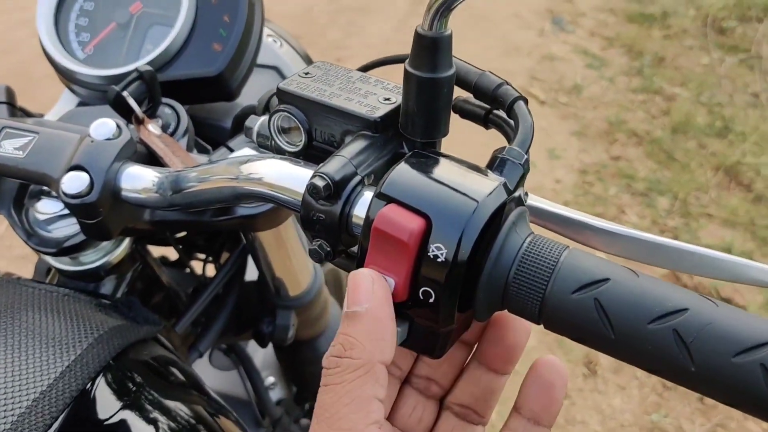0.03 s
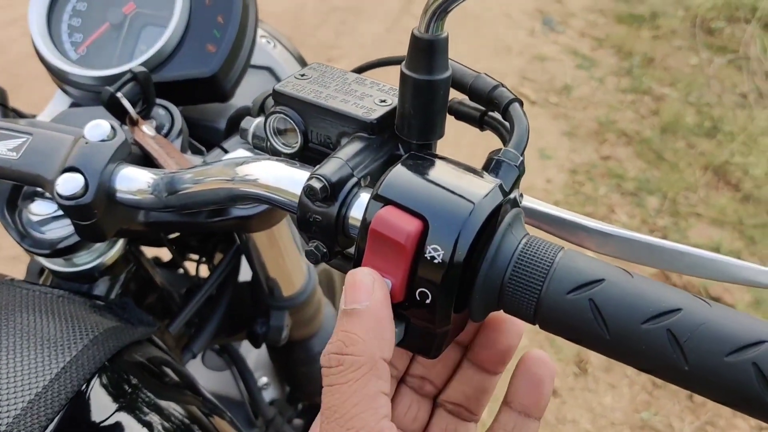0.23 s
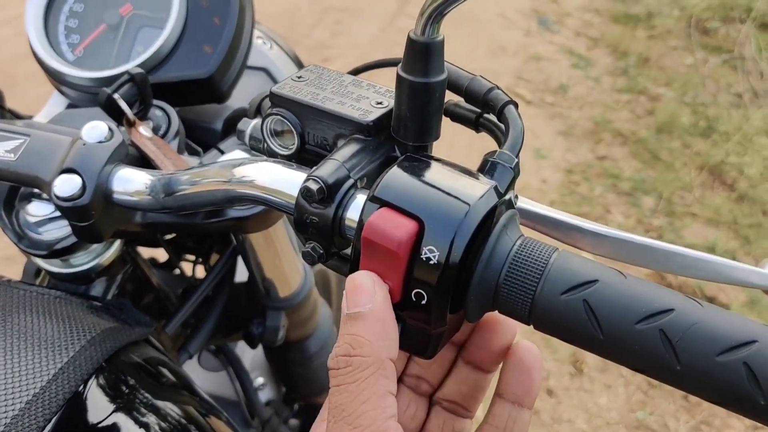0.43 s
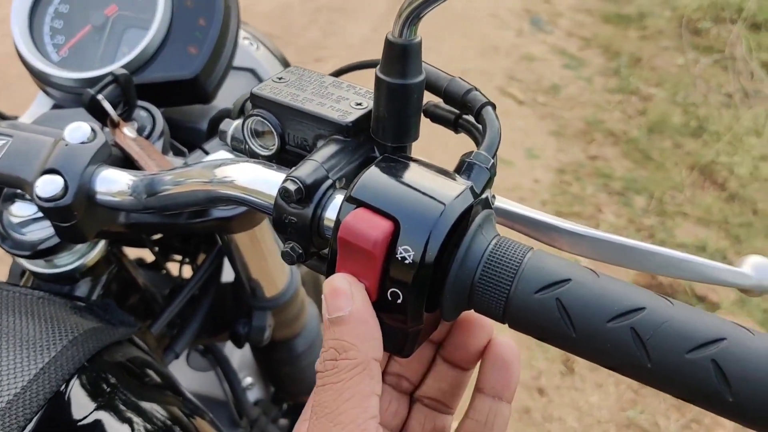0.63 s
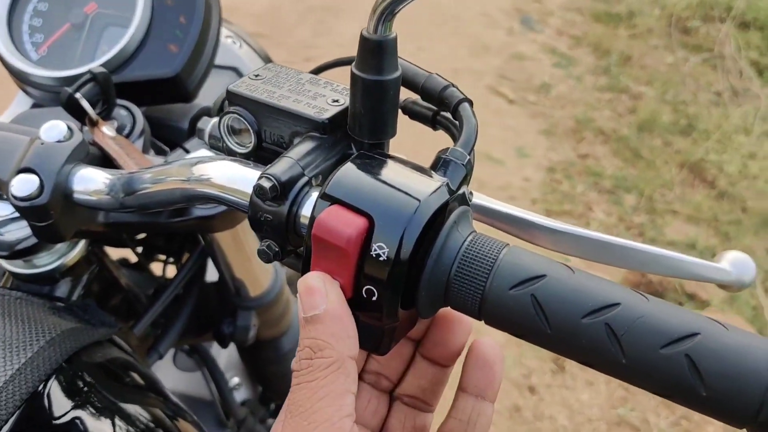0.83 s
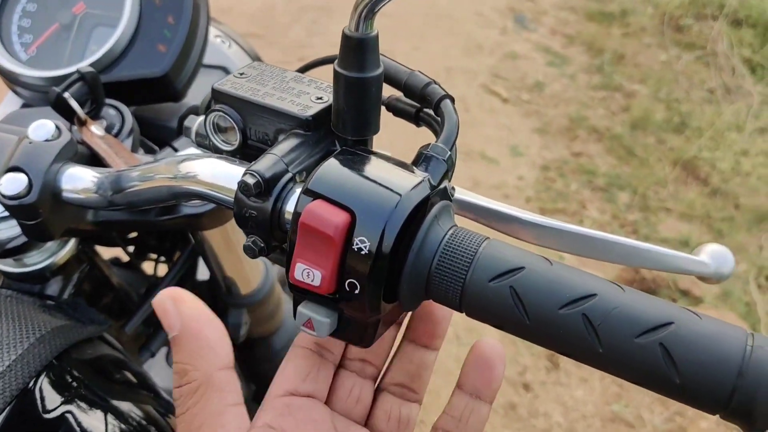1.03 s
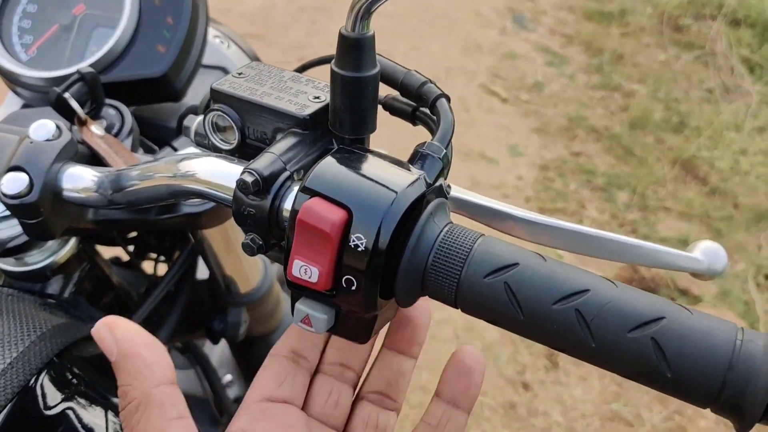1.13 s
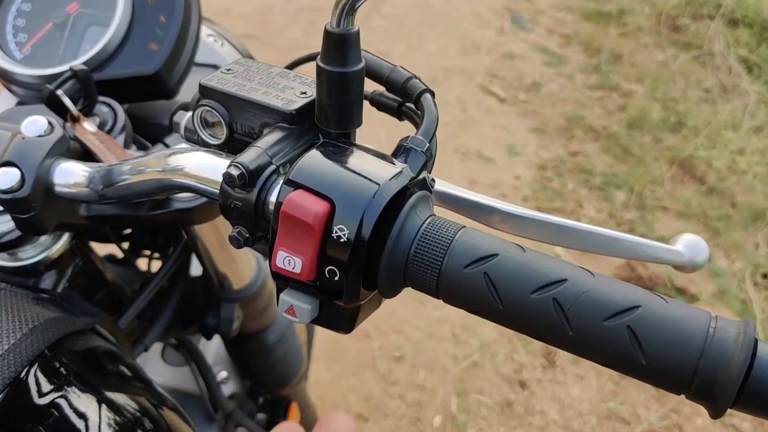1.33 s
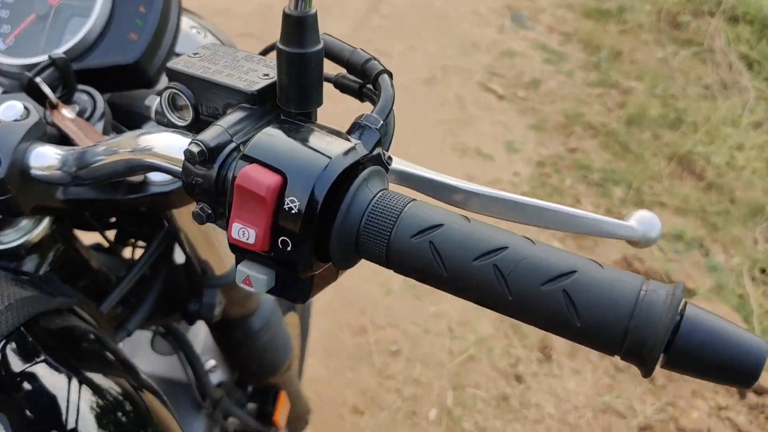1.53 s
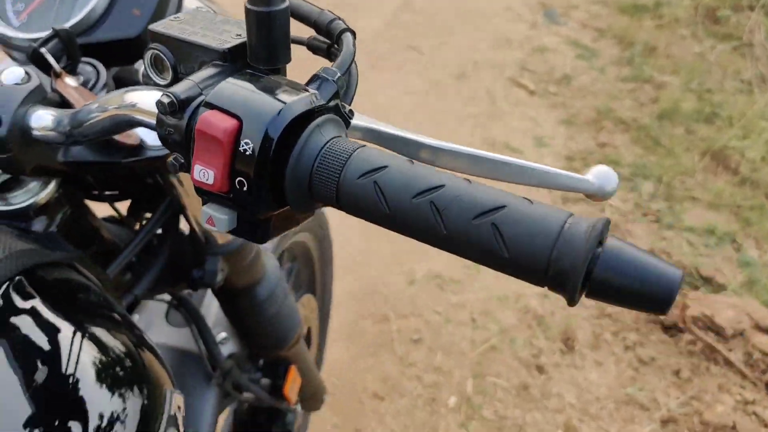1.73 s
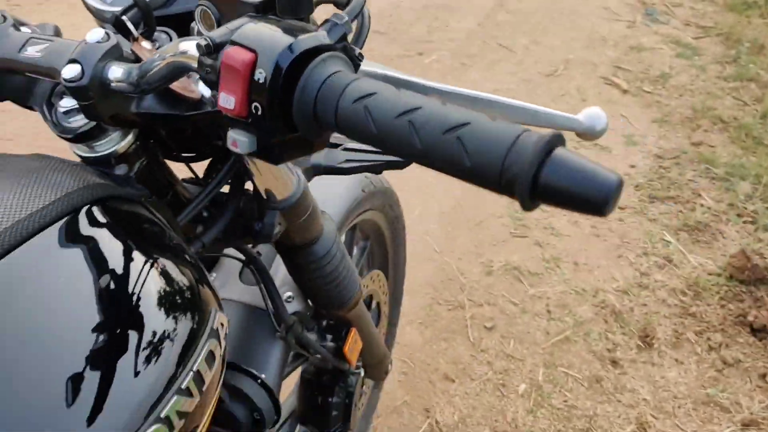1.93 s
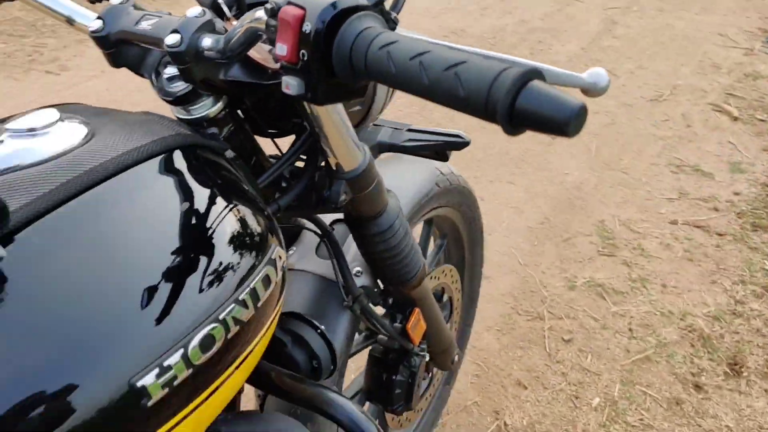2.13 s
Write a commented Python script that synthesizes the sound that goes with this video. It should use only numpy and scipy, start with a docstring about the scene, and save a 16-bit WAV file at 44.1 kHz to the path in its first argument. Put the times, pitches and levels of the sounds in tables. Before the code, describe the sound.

Motorcycle start-up outdoors, a short grinding starter whirr, the single-cylinder engine catching and idling with clatter

```python
"""Motorcycle starting outdoors

A single-cylinder motorcycle is started, heard from a phone held by the handlebar; a far bird calls first.
Coloured noise makes the yard, wind, starter grind, knocks and clatter; gliding sines make the gear whines,
short casing rings and bird. Short pressure swings make the puffs and firings, which settle to a thumping
idle with a silencer ring.
The right microphone port is half covered: it lags, rings near 1.5 kHz and is dull above.
"""
import sys
import numpy as np
from scipy import signal
from scipy.fft import rfft, irfft, next_fast_len
from scipy.io import wavfile
from scipy.ndimage import uniform_filter1d

SR = 44100
rng = np.random.default_rng(int(sys.argv[2]) if len(sys.argv) > 2 else 0)


def dump(signal):
    """Clip the signal to [-1, 1] and save it as 16-bit WAV at the path in sys.argv[1]."""
    limited = np.clip(np.atleast_2d(signal).T, -1, 1)
    pcm = np.round(limited * 32767).astype(np.int16)
    wavfile.write(sys.argv[1], SR, pcm)


def volts(x):
    """Linear amplitude factor 10**(x/20) for a level x in dB, scalar or array-like."""
    e = np.asarray(x, float) / 20
    return 10 ** e


N = 95697
T = np.arange(N) / SR  # time in s
PADDED = next_fast_len(N + 8192)  # transform length, with room for tails
SILENT_DB = -150

# Spectra give only the colour of a noise: its overall level is set apart.
# background of the yard: f/Hz, density/dB
YARD_COLOUR = [(120, -51), (200, -3), (293, -12), (414, -23.5), (1260, -19), (3420, -26.5), (4180, -31.5),
               (4840, -23), (6830, -72), (15500, -47)]
YARD_DB = -51.5
# wind rumble: f/Hz, density/dB
WIND_COLOUR = [(15, -2), (30, -2.5), (90, -1.5), (150, -9.5), (280, -26.5), (400, -68)]
# wind strength before the left and right offsets: t/s, level/dB
GUSTS = [(0, -42), (.4, -45), (.6, -51), (.75, -41.5), (2.17, -41)]
# how alike the noise is at both ports: f/Hz, likeness/(0 to 1)
LIKENESS = [(300, 0.98), (500, 1), (700, 0.04), (1300, 0.73), (2000, 0.53), (3000, 0.43), (4000, 0),
            (15000, .03)]
# a far bird, before its level flickers: t/s, f/Hz, level/dB
BIRD = [(.14, 7700, -74), (.19, 6600, -71), (.255, 5350, -61), (.31, 4700, -63)]

# starter strength: t/s, grind level/dB, brush hiss level/dB, drive of the casing ring/dB
STARTER = [(0.443, -24.5, -51, -25), (0.461, -32, -51.5, -23), (.482, -26.5, -41, -38),
           (0.522, -25, -38, -47), (.55, -30.5, -49.5, -40), (.596, -33.5, -53.5, -30.5),
           (.604, -25.5, -39, -34), (.64, -29.5, -43.5, -24.5), (.66, -28.5, -38, -22),
           (.69, -30, -39.5, -23), (.725, -31.5, -45, -24.5), (0.759, -30, -35, -14.5),
           (.802, -28.5, -38, -19.5), (0.831, -30.5, -48.5, -32), (.862, -33.5, -49, -26),
           (0.871, -28.5, -38.5, -25), (.906, -22, -32, -16.5), (0.932, -43, -52, -40)]
# gear teeth: f/Hz, density/dB
GRIND_COLOUR = [(200, -12), (580, -13.5), (1000, -10), (2000, -8), (3500, -11), (5400, -23.5), (6000, -41),
                (12000, -40)]
# casing resonances, pitch before it strays: f/Hz, width/Hz, gain/dB
CASING_MODES = [(790, 23, 0.5), (1300, 117, -4), (1787, 37, 5), (2950, 67, -5), (4885, 90, 14.5)]
# brush hiss: f/Hz, density/dB
BRUSH_COLOUR = [(2000, -32), (5000, 9), (6200, -1.5), (7200, 1), (12000, -9.5), (15500, -14)]
# thin metal inside the starter, pitch before it strays: f/Hz, gain/dB
ROTOR_MODES = [(7150, 3.6), (8000, 2.6), (9200, 4.3)]
ROTOR_WIDTH_HZ = 300
# switch, relay and pinion knocks, and short bursts of starter noise: t/s, level/dB, decay/s
KNOCKS_AND_BURSTS = [(0.146, -42, 0.0038), (0.4344, -16, 0.0032), (0.448, -18.5, 0.0036),
                     (0.869, -15.5, 0.0023), (0.95, -20, 0.0034), (.647, -22.5, 0.0034),
                     (0.759, -29, 0.0074), (0.988, -25, 0.0068)]
# colour of the knocks and bursts: f/Hz, density/dB
KNOCK_COLOUR = [(300, -24), (900, 7.5), (3000, -1), (5200, -1.5), (6000, -21), (7200, -14), (12000, -29.5),
                (15500, -29)]
# gear whines and short casing rings, one list each, before flutter: t/s, f/Hz, level/dB
WHINES_AND_RINGS = [
    [(.6, 790, -54), (.61, 790, -25.5), (.645, 820, -35)],
    [(.9, 760, -43), (.91, 733, -23), (.922, 775, -55)],
    [(.476, 3080, -26), (.487, 3180, -30), (.533, 4050, -26.5), (.548, 4200, -42)],
    [(.505, 2850, -52), (.527, 2950, -16.5), (.54, 3050, -26.5), (.553, 3350, -25), (.572, 3750, -30.5),
     (.593, 4080, -21.5), (.62, 4250, -37)],
    [(.88, 2850, -46), (.892, 2950, -22), (.905, 3300, -25.5), (.915, 3400, -37)],
    [(.9, 4100, -34), (.93, 4400, -39), (1.0, 5000, -44)],
    [(1.1, 4400, -61), (1.145, 4130, -44.5), (1.178, 4020, -31.5), (1.21, 3980, -51)],
]
FLUTTER_HZ, STARTER_FLUTTER, BIRD_FLUTTER = 78, 0.44, 0.6  # rate, then depths as a share of the level

# strokes without ignition: t/s, level/dB, f/Hz, length/s, silencer ring level/dB
PUFFS = [(0.631, -16.5, 53.3, 0.011, -30), (1.0667, -7, 63.4, 0.0073, -23)]
PUFF_LEAN = 0.4  # how late the puff is strongest, in lengths
# exhaust firings: t/s, blast level/dB, silencer ring level/dB, force of the valve chuff before it
FIRINGS = [(0.9503, -1.5, -12, 0.7), (1.196, -2.5, -14, 1.4), (1.317, -5, -13.5, 0.97),
           (1.4297, -5, -12.5, 1), (1.5455, -8, -14, 0.54), (1.6603, -7, -14, 0.7), (1.7734, -8, -14, 0.88),
           (1.885, -7, -13, 0.77), (1.998, -5.5, -13.5, 0.82), (2.112, -7, -13, 0.89)]
BLAST_HZ, BLAST_S, BLAST_LEAN = 97, 0.0068, 0.05  # pitch, length, lateness in lengths
VALVE_OPENS_S, OPENING_S = -0.0082, 0.002  # start from the firing time, time to open
PIPE_HZ, PIPE_DB, PIPE_S = 270, -17.5, 0.005  # overtone of the pipe, level under the blast
ECHO_S, ECHO_DB = 0.0175, -20  # the blast returns from the pipe's far end
RASP_DB, RASP_SLOPE = 3, 9.5  # bark level at a 0 dB blast, rise in dB per dB of blast
RASP_HZ, RASP_S = 740, 0.002
RING_HZ, RING_DELAY_S, RING_CREST_S = 47.5, 0.003, 0.0305
RING_T60_S = 0.12  # time to fall by 60 dB

# running engine; the share grows as the phone nears the cylinder head, then eases:
# t/s, clatter level/dB, share of the valve swell
RUNNING = [(.9, -49, .5), (0.931, -32.5, 0.55), (1.6, -33.5, 0.71), (1.9, -36, 1.77), (2.17, -34.5, 1.15)]
# chain and gear whirr: f/Hz, density/dB
WHIRR_COLOUR = [(150, -9.5), (300, 1), (550, -7), (800, -2), (1400, -1), (2100, -7), (3100, -8),
                (3900, -12.5), (4900, -9.5), (5500, -17), (6000, -27.5), (8500, -26.5), (12000, -34.5),
                (15500, -37)]
WHIRR_TICKS_DB = 2.2  # spread of tick strength
# valve gear in each cycle, swell before force and share: t from firing/s, width/s, swell/dB
VALVES = [(-.024, 0.0098, 4.5), (-.003, 0.011, 2.5), (.031, 0.014, 3)]
# engine block resonances, pitch before it strays: f/Hz, width/Hz, gain/dB
BLOCK_MODES = [(790, 39, -1), (1495, 27.4, -1.5), (2373, 85, 5), (3190, 220, -3.5), (4850, 66, -3.5)]
BLOCK_FOLLOWS = 2.2  # the block's drive swells this many times more, in dB, than the whirr
WANDER, WANDER_S = 0.006, 0.015  # rms share by which resonances stray as parts turn, smoothing time

# tone of the half-covered right port: f/Hz, gain/dB
RIGHT_PORT = [(60, 0.5), (300, -3.5), (500, 0.5), (800, -7), (1050, -13.5), (1500, -7.5), (2100, 0.8),
              (2500, -17), (3100, -9.5), (3800, -17.5), (4900, -39), (6000, -30), (8500, -16.5),
              (15500, -23)]
RIGHT_LAG_S = 0.00028
# ring in the cupped hand as the grip shifts: t/s, f/Hz, gain/dB
CUP = [(0, 1300, 1.5), (.5, 1526, 13), (1.76, 1532, 16.5), (1.9, 1640, 12), (2.17, 1690, 4.5)]
CUP_WIDTH_HZ = 277
LOW_CUT_HZ, HISS_DB = 8, -69


def evened(x):
    """Scales a signal to an rms of 1."""
    return x / np.sqrt(np.mean(x ** 2) + 1e-20)


def read(points, hz):
    """Reads a curve between its points, on a logarithmic pitch scale."""
    f, value = np.transpose(points)
    return np.interp(np.log(hz + 1), np.log(f + 1), value)


def level_curve(t, db):
    """Turns level points in dB into an envelope, silent outside them."""
    return volts(np.interp(T, t, db, SILENT_DB, SILENT_DB))


def drift(span_s):
    """Slow random wandering of rms 1, made by smoothing noise twice."""
    size = round(span_s * SR)
    once = uniform_filter1d(rng.standard_normal(N), size)
    return evened(uniform_filter1d(once, size))


def resonate(x, hz, width):
    """Resonance of gain 1, fixed or moving: shift its pitch to zero, smooth, shift back."""
    turn = np.exp(2j * np.pi * np.cumsum(hz * np.ones(N)) / SR)
    r = np.exp(-np.pi * width / SR)
    return 2 * (turn * signal.lfilter([1 - r], [1, -r], x / turn)).real


def body(x, modes):
    """Rings solid parts: each resonance strays a little in pitch."""
    out = 0
    for hz, width, db in modes:
        moving_hz = hz * (1 + WANDER * drift(WANDER_S))
        out = out + volts(db) * resonate(x, moving_hz, width)
    return out


def burr(spectrum, per_s, spread_db, tail_s):
    """Coloured noise roughened by random ticks, partly alike at both ports; returns a player of envelopes."""
    strength = volts(spread_db * np.minimum(rng.exponential(1, N), 4))
    ticks = strength * (rng.random(N) < per_s / SR)
    grain = evened(signal.lfilter([1], [1, -np.exp(-1 / (tail_s * SR))], ticks) + 1e-9)
    noise = grain * rng.standard_normal((2, N))
    hz = np.fft.rfftfreq(PADDED, 1 / SR)
    colour = volts(read(spectrum, hz))
    colour = colour / np.sqrt(np.mean(colour ** 2))
    same = np.clip(read(LIKENESS, hz), 0, 1)

    def play(envelope):
        """Shapes the noise in time, then colours it and shares it between the ports."""
        a, b = rfft(noise * envelope, PADDED)
        right = same * a + np.sqrt(1 - same ** 2) * b
        return irfft(colour * np.array([a, right]), PADDED)[:, :N]
    return play


def glide(rows, flutter):
    """A sine along a pitch curve, its level fluttering."""
    t, hz, db = np.transpose(rows)
    wobble = 1 + flutter * np.sin(2 * np.pi * (FLUTTER_HZ * T + rng.random()))
    tone = np.sin(2 * np.pi * np.cumsum(np.interp(T, t, hz)) / SR)
    return level_curve(t, db) * wobble * tone


def yard():
    """Steady background noise of the yard."""
    return burr(YARD_COLOUR, 6000, 1.2, 0.004)(volts(YARD_DB))


def wind():
    """Low, uneven wind rumble, stronger on the left."""
    rumble = burr(WIND_COLOUR, 900, 2.5, 0.01)(volts(np.interp(T, *np.transpose(GUSTS))))
    return rumble * volts([[2.5], [-1.5]])  # left, right in dB


def bird():
    """A falling, fluttering whistle whose level also flickers at random."""
    flicker = np.clip(1 + 0.5 * drift(0.012), 0, 1)
    return glide(BIRD, BIRD_FLUTTER) * flicker


def starter():
    """Teeth rattle the casing, brushes hiss, parts knock or burst into noise, gears whine, the casing rings."""
    t, grind_db, brush_db, casing_db = np.transpose(STARTER)
    teeth = burr(GRIND_COLOUR, 5000, 3.3, 0.0032)
    grind = teeth(level_curve(t, grind_db))
    casing = body(teeth(level_curve(t, casing_db)), CASING_MODES)

    rub = level_curve(t, brush_db)
    hiss = burr(BRUSH_COLOUR, 3000, 2.4, 0.002)(rub)
    for hz, db in ROTOR_MODES:
        scrape = burr(BRUSH_COLOUR, 300, 3.0, 0.004)(rub)  # sparser ticks
        hiss = hiss + body(scrape, [(hz, ROTOR_WIDTH_HZ, db)])

    hits = np.zeros(N)
    for s, db, decay in KNOCKS_AND_BURSTS:
        hits += volts(db) * (T > s) * np.exp(-np.maximum(T - s, 0) / decay)
    knocks_and_bursts = burr(KNOCK_COLOUR, 9000, 1.5, 0.001)(hits)
    whines_and_rings = sum(glide(rows, STARTER_FLUTTER) for rows in WHINES_AND_RINGS)
    return grind + casing + hiss + knocks_and_bursts + whines_and_rings


def silencer_ring(s, db):
    """The silencer volume builds up to a crest after a pulse, then swings out."""
    rise = np.clip((T - s - RING_DELAY_S) / (RING_CREST_S - RING_DELAY_S), 0, 1)
    u = T - s - RING_CREST_S  # time from the crest
    fall = volts(db - 60 * np.maximum(u, 0) / RING_T60_S)
    return fall * np.sin(np.pi / 2 * rise) * np.cos(2 * np.pi * RING_HZ * u)


def exhaust():
    """Puffs and firings: a blast with overtone and echo, a bark that grows with force, a silencer ring."""
    out, bark, blasts = np.zeros((3, N))
    for s, db, hz, length, ring_db in PUFFS:
        u = T - s
        swell = np.exp(-(u / length - PUFF_LEAN) ** 2)
        out += volts(db) * swell * np.cos(2 * np.pi * hz * u)
        out += silencer_ring(s, ring_db)
    for s, blast_db, ring_db, _ in FIRINGS:
        u = T - s
        opening = np.clip((u - VALVE_OPENS_S) / OPENING_S, 0, 1)
        swell = np.exp(-(u / BLAST_S - BLAST_LEAN) ** 2)
        swing = opening * swell * np.cos(2 * np.pi * BLAST_HZ * u)
        overtone = volts(PIPE_DB) * np.exp(-(u / PIPE_S) ** 2) * np.cos(2 * np.pi * PIPE_HZ * u)
        blasts -= volts(blast_db) * (swing - overtone)
        rasp = np.exp(-(u / RASP_S) ** 2) * np.sin(2 * np.pi * RASP_HZ * u)
        bark += volts(RASP_DB + RASP_SLOPE * blast_db) * rasp
        out += silencer_ring(s, ring_db)
    echo = volts(ECHO_DB) * np.interp(T - ECHO_S, T, blasts)
    return out + blasts + echo + bark


def engine():
    """Chain and gear whirr rings the block, swelling where the valves work in each cycle."""
    cycles = [row[0] for row in FIRINGS] + [PUFFS[-1][0]]  # the last puff works the valves too
    force = rng.uniform(0.8, 0.87, (len(cycles), len(VALVES)))
    force[:-1, 0] = [row[-1] for row in FIRINGS]  # the chuff before each firing
    swell_db = np.zeros(N)
    for s, row in zip(cycles, force):
        for push, (at, width, db) in zip(row, VALVES):
            swell_db += push * db * np.exp(-((T - s - at) / width) ** 2)

    t, db, share = np.transpose(RUNNING)
    level_db = np.interp(T, t, db, SILENT_DB)
    swell_db = swell_db * np.interp(T, t, share)
    whirr = burr(WHIRR_COLOUR, 4500, WHIRR_TICKS_DB, 0.004)
    struck = whirr(volts(level_db + BLOCK_FOLLOWS * swell_db))
    return whirr(volts(level_db + swell_db)) + body(struck, BLOCK_MODES)


def scene():
    """Adds up all the sounds at the two ports."""
    return yard() + wind() + bird() + starter() + exhaust() + engine()


def top_cut(x):
    """Nothing passes above the cut-off."""
    return signal.sosfilt(signal.butter(12, 16420, fs=SR, output="sos"), x)


def record(dry):
    """The right port lags, loses treble and rings in the cupped hand; faint electronic hiss on both."""
    dry = signal.lfilter(*signal.butter(1, LOW_CUT_HZ, "high", fs=SR), dry)
    hz = np.fft.rfftfreq(PADDED, 1 / SR)
    lag = np.exp(-2j * np.pi * hz * RIGHT_LAG_S)
    right = irfft(rfft(dry[1], PADDED) * volts(read(RIGHT_PORT, hz)) * lag, PADDED)[:N]

    t, cup_hz, cup_db = np.transpose(CUP)
    cup_hz = np.interp(T, t, cup_hz)
    cup = resonate(dry[1], cup_hz, CUP_WIDTH_HZ)
    cup = resonate(cup, cup_hz, CUP_WIDTH_HZ * 2)
    right = right - volts(np.interp(T, t, cup_db)) * cup

    hiss = volts(HISS_DB) * rng.standard_normal((2, N))
    mix = np.array([dry[0], right]) + hiss
    return top_cut(mix)


dry = scene()
out = record(dry)
dump(out)
```